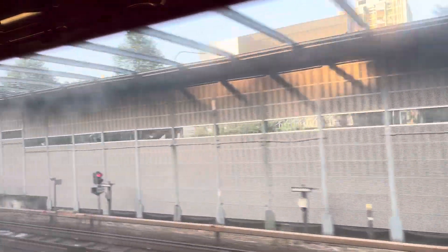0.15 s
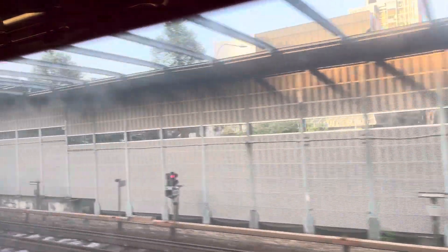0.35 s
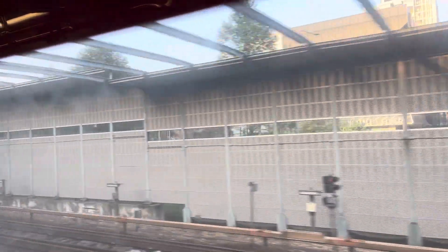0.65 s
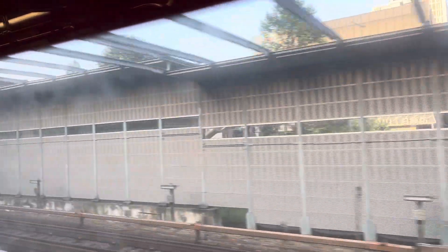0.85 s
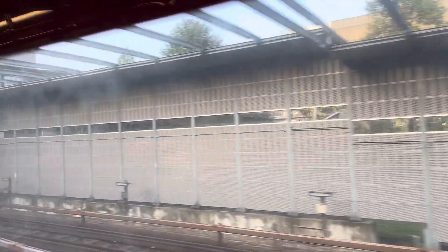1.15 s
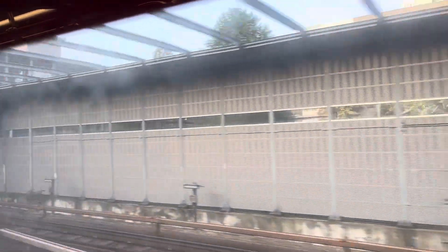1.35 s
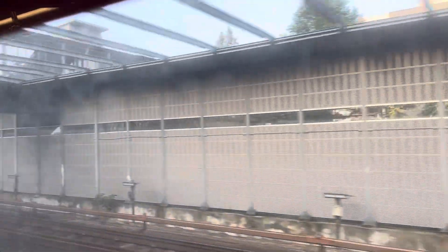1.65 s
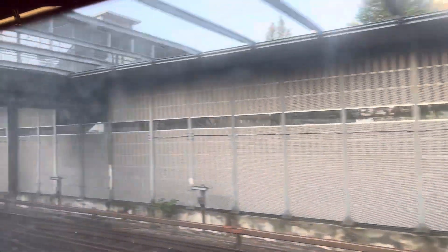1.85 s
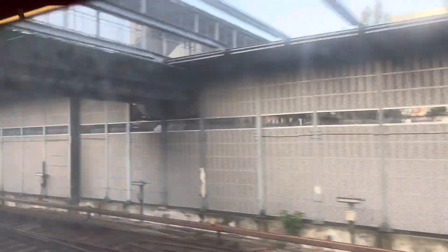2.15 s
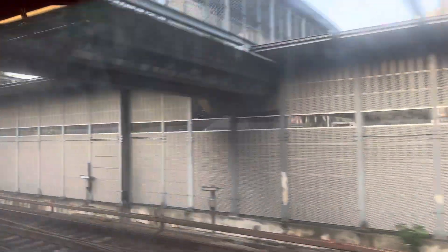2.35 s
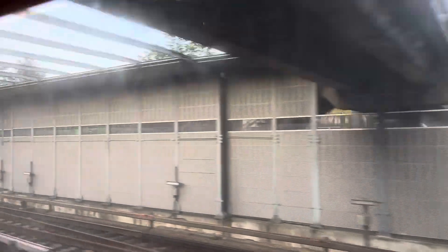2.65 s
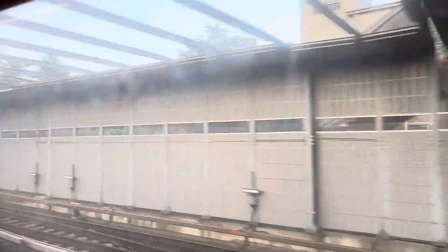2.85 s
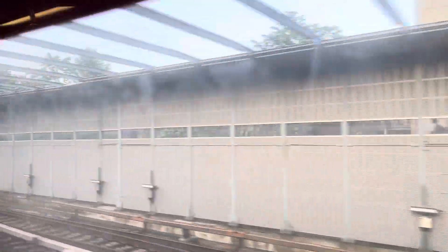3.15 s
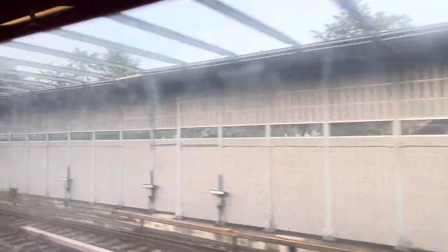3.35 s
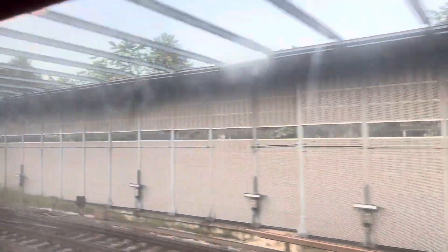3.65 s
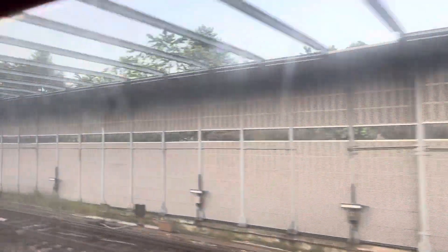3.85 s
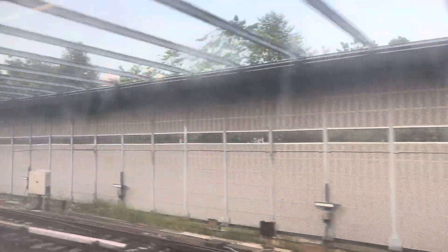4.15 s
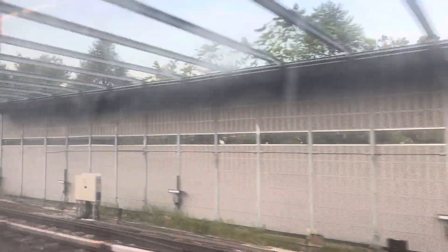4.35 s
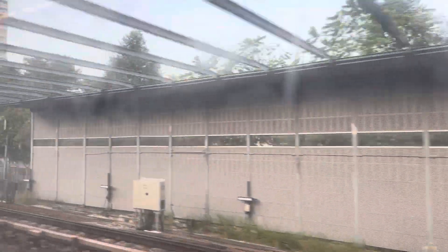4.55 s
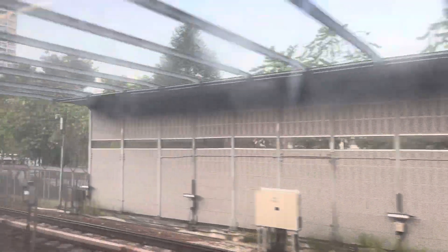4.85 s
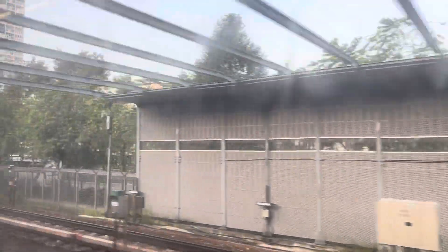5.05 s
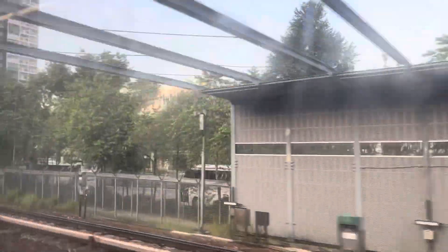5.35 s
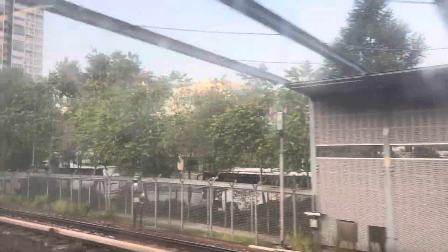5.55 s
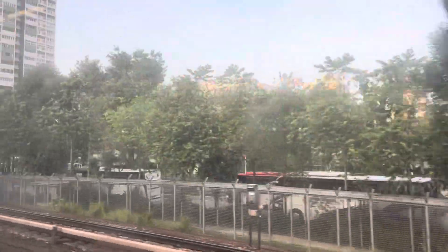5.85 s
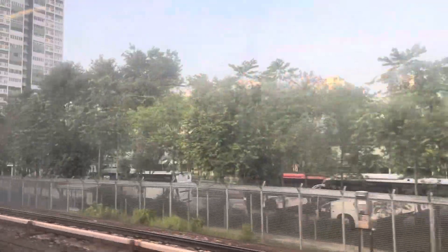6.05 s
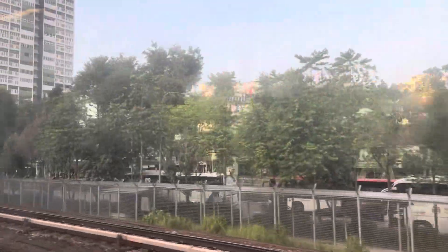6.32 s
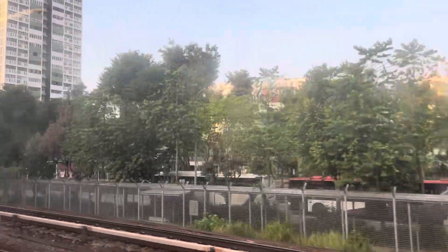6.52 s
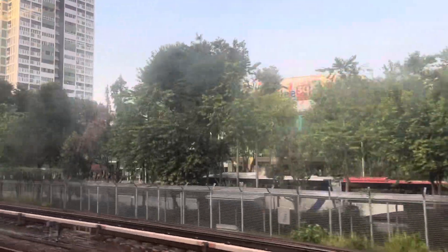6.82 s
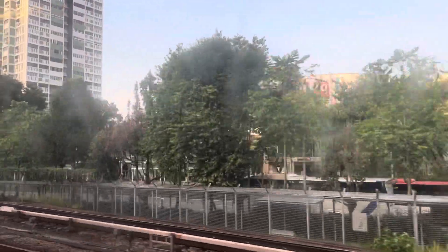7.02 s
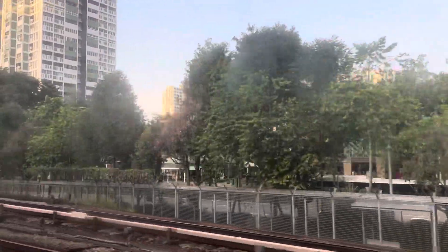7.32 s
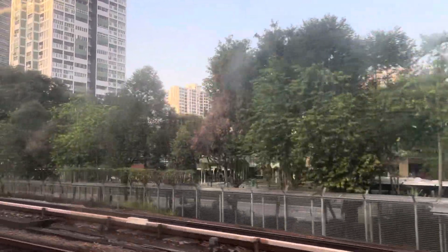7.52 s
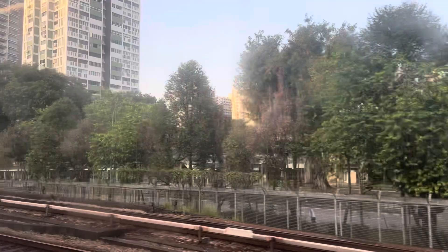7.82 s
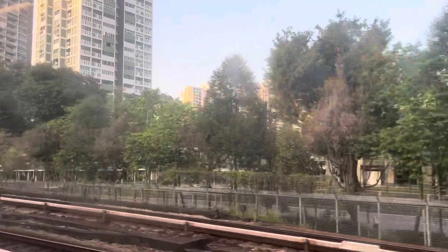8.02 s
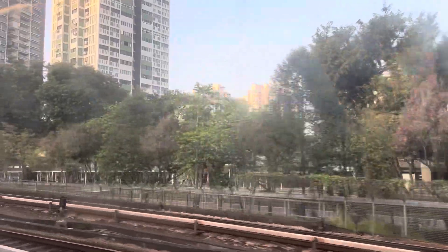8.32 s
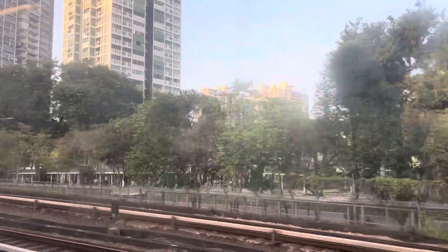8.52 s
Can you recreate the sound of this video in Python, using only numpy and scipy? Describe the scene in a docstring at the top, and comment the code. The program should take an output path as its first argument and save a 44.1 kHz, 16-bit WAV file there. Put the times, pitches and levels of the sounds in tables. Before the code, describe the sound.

A train cabin rumbles steadily; bogie knocks and a grinding crossing clatter early, a worn wheel thumps, then steel hisses and scrapes softly along the rail.

```python
"""A low rumble and roar fill a metro car on an open-air track: noise that grows as the track shakes the car.
At once the bogie knocks over a set of points, in cracks, clanks and thuds that ring steel and floor;
then it grinds through a crossing in many small blows, and a worn wheel thumps once a turn.
Later steel rubs along a rail with a thin hiss and a few short scrapes, and the drive whines faintly.
"""
import sys
import numpy as np
from scipy import signal
from scipy.fft import rfft, irfft, next_fast_len
from scipy.io import wavfile
from scipy.ndimage import uniform_filter1d, minimum_filter1d, map_coordinates

SR = 44100
rng = np.random.default_rng(int(sys.argv[2]) if len(sys.argv) > 2 else 0)


def pcm_store(signal):
    """Save signal as 16-bit PCM."""
    levels = np.round(np.clip(np.atleast_2d(signal), -1, 1) * 32767)
    wavfile.write(sys.argv[1], SR, levels.astype(np.int16).T)


N = 382788  # length in samples

BITE_S = .0015  # steel on steel bites at once: time constant of the rise

# Knocks of the wheels at the points and the crossing. Each row: start in seconds, levels in dB (before each
# layer's trim) of the steel crack, the floor thud and the bogie clank, pitch of the floor in Hz.
KNOCKS = [(0.0662, -53, -32, -35, 344), (0.137, -51, -30, -48, 291), (0.2226, -32.5, -23.5, -32, 474),
          (0.367, -39, -23, -48, 298), (0.4304, -26, -25.5, -24.5, 395), (0.5782, -30, -22, -32, 313),
          (0.6945, -37, -26, -26.5, 335), (0.7414, -41, -31, -35, 316), (0.78, -58, -29.5, -43, 317),
          (0.845, -47, -25, -35, 370), (0.9155, -41, -28.5, -36, 283), (0.9764, -37.5, -29, -36, 289),
          (1.123, -40, -35, -35, 302), (1.401, -42, -33, -34, 425), (1.512, -54, -28, -38, 314),
          (1.728, -63, -56, -40, 383), (1.8818, -40.5, -33.5, -38, 350), (2.0375, -38, -39, -37, 445),
          (2.186, -46, -30.5, -37, 182), (2.206, -42, -27, -36, 237), (2.349, -34, -31, -42, 308),
          (2.397, -46, -33.5, -37, 326), (2.515, -50, -34, -40, 560), (2.543, -50, -42, -41, 398),
          (2.675, -55, -37, -39, 600), (2.705, -54, -53, -42, 440)]
# Wheels grinding through the crossing. Each row: start in seconds, length in seconds, levels in dB
# (before any layer's trim) of the grinding, the clank and the floor thud, pitch of the floor in Hz.
CROSSING = [(2.173, 0.065, -36.5, -36, -31, 174), (2.27, 0.04, -48.5, -49, -38, 240),
            (2.322, 0.066, -34.5, -42, -25.5, 307.4), (2.492, 0.033, -62, -43, -33.5, 403)]
# Modes of the wheels and bogie. Each row: pitch in Hz, relative level in dB, T60 in seconds.
STEEL = [(1030, -5, 0.14), (1410, -7, 0.19), (1500, 1, 0.16), (1937, 7, 0.23), (2410, -0.5, 0.064),
         (2640, -15, 0.19), (3370, -2, 0.21), (4540, -15, .14)]
# Colour of the floor's thud. Each row: frequency in Hz, relative level in dB per Hz.
THUD = [(90, -30), (170, 5.5), (240, -26), (305, 2), (360, -8.5), (450, -5.5), (650, -11), (1200, -58),
        (3000, -69)]
# Colour of the bogie's clank. Each row: frequency in Hz, relative level in dB per Hz.
CLANK = [(300, -29), (650, 3.5), (1050, 7.5), (1400, 9.5), (1900, 0.5), (4000, -72)]
# Colour of a crack of steel on steel. Each row: frequency in Hz, relative level in dB per Hz.
CRACK = [(800, -52), (1600, -6.5), (2000, 8), (2900, -1.5), (4300, -7), (5300, -19), (7200, -20.5),
         (9000, -36), (15000, -49)]
# Colour of steel scraping the rail. Each row: frequency in Hz, relative level in dB per Hz.
SCRAPE = [(1200, -5), (2200, 8.5), (3300, 3), (4500, 2.5), (5300, -5), (6500, 1), (7300, -2), (8200, -6),
          (10000, -11), (15500, -24)]


def amp(db):
    """Amplitude factor of a level in dB."""
    return 10 ** (np.asarray(db) / 20)


def unit(x):
    """x brought to rms 1."""
    return x / np.sqrt(np.mean(x ** 2) + 1e-20)


def clock():
    """Time of every sample in seconds."""
    return np.arange(N) / SR


def wobble(rate):
    """A smooth random curve, rate knots a second."""
    knots = rng.standard_normal(int(N * rate / SR) + 4)
    return map_coordinates(knots, [clock() * rate])


def filtered(x, response):
    """x times a gain that depends on frequency."""
    m = next_fast_len(N + 8192)
    return irfft(rfft(x, m) * response(np.fft.rfftfreq(m, 1 / SR)), m)[:N]


def bell(f, hz, width):
    """Power curve of one resonance."""
    return 1 / (1 + (2 * (f - hz) / width) ** 2)


def noise(spectrum):
    """Noise of rms 1 with the given spectrum, heard through the ringing panels."""
    # Ringing of the floor and wall panels. Each row: pitch in Hz, width in Hz, lift in dB.
    panels = [(73.3, 35, 4), (172, 25, 1), (242, 11, 1.5), (302, 42, 6.5), (383, 33, 3.5), (436.7, 13, 6.5),
              (985, 340, 7), (1290, 180, 2), (2000, 11, 1.5), (2800, 19, 5.5), (3350, 67, 2),
              (4220, 260, 1), (4650, 180, -0.5)]
    hz, db = np.transpose(spectrum)

    def response(f):
        colour_db = np.interp(np.log(f + 1), np.log(hz + 1), db)
        panels_db = sum(lift * bell(f, centre, width) for centre, width, lift in panels)
        return amp(colour_db + panels_db)

    return unit(filtered(rng.standard_normal(N), response))


def narrow(hz, width):
    """Noise of rms 1 in one resonance; the power curve is used as gain, for steep skirts."""
    return unit(filtered(rng.standard_normal(N), lambda f: bell(f, hz, width)))


def tone(hz, drift_hz, flutter_db, rate):
    """A line of rms 1 that wavers in pitch and level."""
    pitch = hz + drift_hz * wobble(rate)
    return unit(amp(flutter_db * wobble(rate)) * np.sin(2 * np.pi * np.cumsum(pitch) / SR))


def burst(s, length, attack, t60):
    """Envelope of one contact: it rises, lasts, then dies away in the cabin."""
    out = np.zeros(N + SR)
    t = np.arange(SR) / SR
    envelope = (1 - np.exp(-t / attack)) * amp(-60 * np.maximum(t - length, 0) / t60)
    out[max(round(s * SR), 0):][:SR] = envelope
    return out[:N]


def strike(s, t60):
    """Envelope of a blow: a brief direct peak over the ring of the cabin."""
    return burst(s, 0, BITE_S, t60) + .4 * burst(s, 0.0009, BITE_S, t60=0.0074)


def swell(s, length, height, fall_s, rise_s):
    """A slow envelope: it rises to its height, holds for its length and falls back."""
    corners = s + np.cumsum(np.abs([0, rise_s, length, fall_s]))
    return np.interp(clock(), corners, [0, height, height, 0])


def ring(s, hz, attack, t60):
    """One struck mode: a sine of rms 1 at a random phase, with a rise and a decay."""
    out = np.zeros(N + SR)
    t = np.arange(SR // 2) / SR
    sine = np.sqrt(2) * np.sin(2 * np.pi * (hz * t + rng.random()))
    out[round(s * SR):][:len(t)] = sine * (1 - np.exp(-t / attack)) * amp(-60 * t / t60)
    return out[:N]


def contacts(rate):
    """Irregular small impacts of varied size, rate a second."""
    return (rng.random(N) < rate / SR) * amp(1.3 * rng.standard_normal(N))


def clatter(hz, t60, rate):
    """One mode struck over and over at random, rms 1."""
    t = np.arange(SR // 4) / SR
    mode = np.sin(2 * np.pi * hz * t) * amp(-60 * t / t60)
    return unit(signal.fftconvolve(contacts(rate), mode)[:N])


def judder(rate, t60):
    """Envelope of rms 1 made of many small impacts that the cabin blurs together."""
    t = np.arange(SR // 4) / SR
    blow = (1 - np.exp(-t / BITE_S)) * amp(-60 * t / t60)
    power = signal.fftconvolve(contacts(rate) ** 2, blow ** 2)[:N]
    return unit(np.sqrt(np.abs(power)))


def patches(x, depth_db):
    """Each pitch range swells and fades a little on its own."""
    z = signal.stft(x, nperseg=2048)[2]
    field = uniform_filter1d(rng.standard_normal(z.shape), size=5, axis=0)  # across pitch
    field = uniform_filter1d(field, size=8, axis=1)  # along time
    return unit(signal.istft(z * amp(depth_db * unit(field)), nperseg=2048)[1][:N])


def turning(lead_s):
    """Swings between -1 and 1 once a wheel turn, peaking this long before the thump."""
    turn_hz, thump_s = 6.25, 3.355  # turns a second, time of one thump
    return np.cos(2 * np.pi * turn_hz * (clock() + lead_s - thump_s))


def shaking():
    """How hard the track shakes the car, in dB: more on rough stretches, less as the train coasts."""
    # The points, then the crossing. Each row: start in seconds, length in seconds, extra shaking in dB,
    # settling time in seconds.
    rough_track = [(-.01, 1.29, 4, 0.51), (1.997, 0.072, 4, 1.31)]
    ease_db_per_s = 0.2854
    return sum(swell(*stretch, rise_s=0.2) for stretch in rough_track) - ease_db_per_s * clock()


def driven(shake_db, base_db, growth):
    """Level in dB of a layer: a base level plus some dB for each dB of shaking."""
    return base_db + growth * shake_db


def damped(x):
    """The dampers round off the largest swings; what lies above 230 Hz is rolled off; rms 1."""
    return unit(filtered(np.tanh(x * 0.7), lambda f: 1 / (1 + (f / 230) ** 8)))


def rumble(shake_db):
    """Car body on its springs, droning floor and slow sway as noise; body and floor throb as the wheel turns."""
    # The low rumble swells and eases. Each row: centre in seconds, change in dB of the sway, the body rumble
    # and the floor drone.
    level_changes = [(.12, 4, 3, 2.5), (.45, 6.5, -0.5, 8), (.8, -1, 0.5, 7.5), (1.18, -2, 3, -1),
                     (1.4, 5, -5, 5.5), (1.85, 2.5, 3, -5.5), (2.05, 0.5, -5, 1.5), (2.27, 2.5, 0, 6),
                     (2.5, -0.5, -0.5, -1), (2.8, 3, -4, -3), (3.15, 2.5, 1.5, 2.5), (3.6, -6.5, -0.5, 4),
                     (4.4, 0, -2, 3.5), (5.75, -0.5, 0.5, -1.5), (6.8, -1, 0, 1.5), (7.25, -1, 0, 2),
                     (7.66, -1, 2.5, -4), (8.16, 0, 0, -2.5), (8.6, 2, 0.5, 1.5)]
    # Low pushes bounce the car on its springs. Each row: start in seconds, level in dB, pitch in Hz.
    pushes = [(0.544, -20, 42), (0.754, -24, 66.3), (1.15, -23, 86), (2.25, -12, 52), (7.67, -21.5, 70),
              (8.151, -21, 45)]
    # Colour of the shaking body. Each row: frequency in Hz, relative level in dB per Hz before damping.
    body_spectrum = [(25, -0.5), (42, -7), (57, -6.5), (68, 1), (78, -2.5), (88, -2.5), (100, -7),
                     (130, -47), (300, -80)]
    # Colour of the floor drone. Each row: frequency in Hz, relative level in dB per Hz.
    drone_spectrum = [(85, -9), (108, -4), (122, -0.5), (135, 1.5), (165, -3), (188, -1.5), (210, -15),
                      (260, -18), (500, -79)]
    # Colour of the slow sway. Each row: frequency in Hz, relative level in dB per Hz before damping.
    sway_spectrum = [(2, 5.5), (5, 4.5), (11, -5.5), (20, -10.5), (27, 2.5), (33, -7.5), (42, -17),
                     (80, -38)]

    change_s = 0.18  # half-width of each Gaussian change
    sway_db, body_db, drone_db = sum(
        np.outer(changes, np.exp(-((clock() - s) / change_s) ** 2)) for s, *changes in level_changes)
    turn = turning(lead_s=.025)
    body_db = body_db + driven(shake_db, -32, 0.57) + 2.2 * turn + 0.43 * wobble(11.0)
    drone_db = drone_db + driven(shake_db, -39.5, 0.45) + 1.5 * turn + 0.72 * wobble(2.1)
    sway_db = sway_db + driven(shake_db, -29.5, 0.73)

    body = amp(body_db) * damped(noise(body_spectrum))
    drone = amp(drone_db) * patches(noise(drone_spectrum), depth_db=1.4)
    sway = amp(sway_db) * damped(noise(sway_spectrum))
    bounces = sum(amp(db) * ring(s, hz, attack=0.005, t60=0.16) for s, db, hz in pushes)
    return body + drone + sway + bounces


def machinery():
    """Machines under the floor hum at nearly steady pitches."""
    # Hums of the underfloor machines. Each row: pitch in Hz, level in dB.
    machines = [(27.2, -39.5), (49, -44.5), (121.7, -48)]
    return sum(amp(db) * tone(hz, drift_hz=0.17, flutter_db=0.5, rate=2.51) for hz, db in machines)


def booming():
    """Resonances of the car body swell and waver, some together, over the faint hums of the running gear."""
    # Hums of the running gear. Each row: pitch in Hz, level in dB.
    hum_lines = [(247.6, -61), (312, -62), (382, -56.5)]
    # Resonances of the car body. Each row: start in seconds, length in seconds, level in dB, pitch in Hz.
    boom_rows = [(0.19, 0.25, -46, 187), (0.93, .25, -32.5, 79), (0.92, 0.26, -37, 161),
                 (1.05, 0.23, -40, 120), (1.47, 0.29, -43.5, 140)]
    hums = sum(amp(db) * tone(hz, drift_hz=1.8, flutter_db=2.0, rate=9) for hz, db in hum_lines)
    booms = sum(swell(s, length, amp(db), fall_s=.14, rise_s=0.23)
                * tone(hz, drift_hz=2.34, flutter_db=2, rate=11)
                for s, length, db, hz in boom_rows)
    return booms + hums


def rolling(shake_db):
    """Rail roughness makes a roar that flutters as the wheels run over it."""
    # Colour of the roar. Each row: frequency in Hz, relative level in dB per Hz.
    roll_spectrum = [(120, -9), (230, -6.5), (350, -4.5), (480, -3.5), (660, -6.5), (810, -12), (1030, -14),
                     (1350, -12), (1650, -19), (2100, -16), (2800, -22), (3700, -23), (5200, -38.5),
                     (7000, -38), (9000, -48.5), (15000, -67)]
    level = amp(driven(shake_db, -43, 1) + 0.96 * wobble(15))
    return level * patches(noise(roll_spectrum), depth_db=1.0)


def worn_wheel(shake_db):
    """A worn patch on the tread thumps the floor once in every turn."""
    contact = np.exp(1.67 * (turning(lead_s=0) - 1))
    # the patch bears hardest after the crossing
    spell_db = swell(2.1, length=0.4, height=13.7, fall_s=0.85, rise_s=1.36)
    level = amp(driven(shake_db, -51, 3.1) + spell_db + 1.6 * wobble(6.72)) * contact
    floor = 0.9 * noise(THUD) + 0.63 * tone(hz=316.3, drift_hz=16, flutter_db=1.5, rate=25)
    return level * (floor + amp(-10.0) * noise(CLANK) + amp(-16) * noise(CRACK))


def whines(shake_db):
    """The rail rings as a narrow band, the inverter adds thin high lines and wheel modes sing with a flutter."""
    # Lines of the traction inverter. Each row: pitch in Hz, mean level in dB.
    inverter = [(11854, -102), (11964, -95), (12074, -97), (12184, -94)]
    # Wheel modes singing on the rail. Each row: start in seconds, length in seconds, level in dB before the
    # flutter, pitch in Hz, width in Hz.
    singing = [(1.15, 0.045, -65, 4530, 260), (1.963, 0.093, -58, 4460, 300),
               (2.85, 0.13, -58.5, 2170, 160), (6.598, 0.04, -58.5, 2170, 140), (6.874, 0.1, -57, 2126, 75),
               (7.27, 0.03, -60, 2150, 160)]

    # for a spell the rail rings more strongly
    spell_db = swell(4.13, length=0.71, height=5.8, fall_s=0.58, rise_s=0.63)
    rail = amp(driven(shake_db, -54.5, 1) + spell_db) * narrow(hz=1086, width=480)
    lines = sum(amp(db + 1.5 * wobble(2.5)) * unit(np.sin(2 * np.pi * hz * clock() + wobble(11)))
                for hz, db in inverter)
    wheel = sum(swell(s, length, amp(db), fall_s=0.2, rise_s=0.28) * narrow(hz, width)
                for s, length, db, hz, width in singing)
    return rail + lines + amp(2.0 * wobble(22)) * wheel


def sliding(s, length, start_hz, end_hz, width):
    """Scraping noise that passes from one resonance to another during the contact."""
    steel = noise(SCRAPE)
    first = unit(filtered(steel, lambda f: bell(f, start_hz, width)))
    last = unit(filtered(steel, lambda f: bell(f, end_hz, width)))
    done = np.clip((clock() - s) / length, 0, 1)
    return (1 - done) * first + done * last


def rubbing(shake_db):
    """Steel slides along the rail: a thin hiss that swells and fizzes, with short scrapes of sliding pitch."""
    # Spells of rubbing. Each row: start in seconds, rise in seconds, length in seconds, hiss level in dB
    # before the trims below, fizz level in dB.
    rub_rows = [(1.22, 0.1, 0.19, -64, -85), (2.99, 0.24, 0.04, -58.5, -74), (3.36, 0.1, 0.19, -69, -87),
                (3.79, 0.2, 0.04, -65, -77), (4.06, 0.19, 0.07, -59.5, -76), (4.476, 0.051, 0.48, -59, -92),
                (5.113, 0.07, 0.29, -59.5, -88), (5.4, 0.06, 0.25, -67, -73), (5.75, 0.1, 0.45, -68, -86)]
    # Short scrapes. Each row: start in seconds, length in seconds, level in dB before the judder, brightest
    # pitch in Hz at the start and at the end, width in Hz.
    scrape_rows = [(5.292, 0.059, -57, 6900, 6600, 4000), (5.423, 0.068, -52, 4750, 4500, 1000),
                   (5.453, 0.04, -51, 3630, 3450, 800), (5.573, 0.11, -50, 5200, 5360, 3000),
                   (5.789, 0.057, -51, 6000, 5700, 4200), (5.882, 0.054, -51, 6100, 5860, 3000),
                   (6.1, 0.069, -57.5, 5800, 5800, 5000), (6.212, 0.083, -54, 7500, 6200, 4020),
                   (6.45, 0.037, -51.5, 5200, 4400, 8000)]
    # Colour of the hiss. Each row: frequency in Hz, relative level in dB per Hz.
    hiss_spectrum = [(2500, -25), (4500, 3), (5600, 0.5), (6500, 6.5), (7300, 5), (8200, -10), (9700, -17),
                     (11000, -36), (15500, -23)]

    rubs = sum(swell(s, length, amp(db), fall_s=0.19, rise_s=rise) for s, rise, length, db, _ in rub_rows)
    fizz = sum(swell(s, length, amp(db), fall_s=0.092, rise_s=rise) for s, rise, length, _, db in rub_rows)
    flutter = amp(1.5 * wobble(22) - 5.0)
    hiss = (amp(driven(shake_db, -68.5, 0.17)) + rubs) * flutter * noise(hiss_spectrum)
    scrapes = sum(amp(db) * burst(s, length, attack=0.012, t60=0.35)
                  * sliding(s, length, start_hz, end_hz, width)
                  for s, length, db, start_hz, end_hz, width in scrape_rows)
    grating = (scrapes + amp(-5.5) * rubs * noise(SCRAPE)) * judder(rate=700, t60=.07)
    return hiss + fizz * narrow(hz=9100, width=2400) + grating


def knocks():
    """Each knock gives a steel crack and ring, a bogie clank and a longer floor thud at its own pitch."""
    thud = sum(amp(db - 5.0) * burst(s, 0.0027, attack=0.0013, t60=0.4) for s, _, db, _, _ in KNOCKS)
    clank = sum(amp(db - 4.0) * strike(s, t60=0.23) for s, _, _, db, _ in KNOCKS)
    crack = sum(amp(db - 7.0) * strike(s, t60=0.25) for s, db, _, _, _ in KNOCKS)
    floor = sum(amp(db - 3.5) * ring(s, hz, attack=0.00073, t60=0.15) for s, _, db, _, hz in KNOCKS)
    # every blow excites the modes a little differently
    steel = sum(amp(db + mode_db - 21.5 + 2 * rng.standard_normal()) * ring(s, hz, BITE_S, t60)
                for s, db, _, _, _ in KNOCKS for hz, mode_db, t60 in STEEL)
    chatter = amp(0.65 * wobble(220))
    return thud * noise(THUD) + floor + steel + chatter * (clank * noise(CLANK) + crack * noise(CRACK))


def rattles():
    """Loose metal parts chatter after the blows and along rough track; a light tick sounds alone."""
    # Modes of small metal parts in the cabin. Each row: pitch in Hz, relative level in dB.
    jingle = [(9100, -7), (9710, 1), (10400, -2), (11150, -5), (11680, -3), (13100, -5), (14400, -4),
              (15000, -1)]
    # The parts keep rattling on rough track. Each row: start in seconds, length in seconds, level in dB.
    rattle_rows = [(.9, .3, -82), (1.33, 0.14, -76.5)]
    shaken = sum(amp(db - 38.5) * burst(s, 0, attack=0.017, t60=0.23) for s, db, *_ in KNOCKS)
    shaken += sum(amp(db - 30.5) * burst(s, length, attack=0.021, t60=0.23) for s, length, db, *_ in CROSSING)
    shaken += sum(swell(s, length, amp(db), fall_s=.1, rise_s=.06) for s, length, db in rattle_rows)
    parts = unit(sum(amp(db) * clatter(hz, t60=.014, rate=170) for hz, db in jingle))
    tick = amp(-63) * burst(1.8278, 0, attack=.0006, t60=.05) * narrow(hz=8000, width=6000)
    return shaken * parts + tick


def fitting():
    """A loose metal fitting gives a thin, short ring after the hardest knock: narrow noise that dies away."""
    return amp(-58) * burst(.463, 0.0073, attack=0.0051, t60=.25) * narrow(hz=7200, width=160)


def crossing():
    """The wheel clatters across in many small blows that ring the steel; the floor booms just after each bite."""
    # Colour of the grinding. Each row: frequency in Hz, relative level in dB per Hz.
    grind_spectrum = [(400, 4), (700, -29), (1300, -4), (1800, -1.5), (3000, -2.5), (4500, -5),
                      (5300, -15.5), (7200, -13.5), (9000, -30.5), (15000, -49)]
    # Colour of the floor's boom. Each row: frequency in Hz, relative level in dB per Hz.
    boom_spectrum = [(90, -11), (180, 3), (240, -3), (310, -7), (450, 1), (650, -9), (1200, -29),
                     (3000, -65)]
    grind = sum(amp(db) * burst(s, length, attack=0.019, t60=0.37) for s, length, db, _, _, _ in CROSSING)
    clank = sum(amp(db) * burst(s, length, attack=0.03, t60=0.16) for s, length, _, db, _, _ in CROSSING)
    floor_noise = noise(boom_spectrum)
    boom = sum(amp(db) * burst(s + 0.02, length, attack=0.045, t60=0.13)
               * (0.89 * floor_noise + 0.54 * tone(hz, drift_hz=13.4, flutter_db=0, rate=44))
               for s, length, _, _, db, hz in CROSSING)
    steel = unit(sum(amp(db) * clatter(hz, t60, rate=100) for hz, db, t60 in STEEL))
    blows = judder(rate=520, t60=.09)
    grinding = blows * (grind * noise(grind_spectrum) + clank * noise(CLANK))
    return grinding + amp(-14.0) * grind * steel + boom


def scene():
    """The track shakes the whole car; all sources meet at one microphone by the window."""
    shake_db = shaking()
    running = rumble(shake_db) + machinery() + booming() + rolling(shake_db)
    wheels = worn_wheel(shake_db) + whines(shake_db) + rubbing(shake_db)
    blows = knocks() + rattles() + fitting() + crossing()
    return (running + wheels + blows)[None]


def record(dry):
    """The microphone chain adds faint even hiss, turns down the highest peaks and cuts all above its band."""
    ceiling, top_hz = .29, 15750
    heard = dry[0] + amp(-77.5) * rng.standard_normal(N)
    needed = ceiling / np.maximum(np.abs(heard), ceiling)
    # hold the lowest gain over 10 ms, then smooth it over 10 ms
    gain = uniform_filter1d(minimum_filter1d(needed, size=441), size=441)
    return filtered(heard * gain, lambda f: f < top_hz)[None]


dry = scene()
out = record(dry)
pcm_store(out)
```